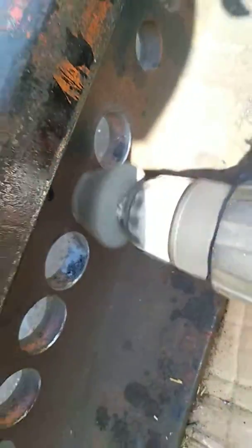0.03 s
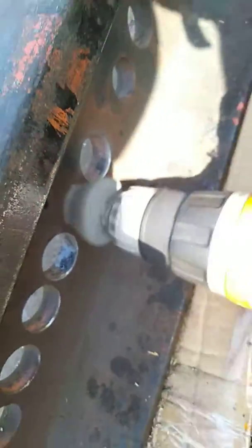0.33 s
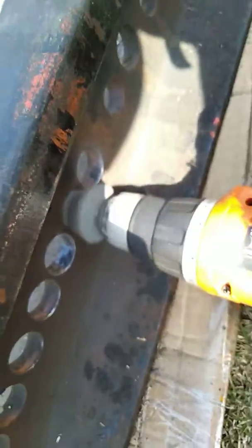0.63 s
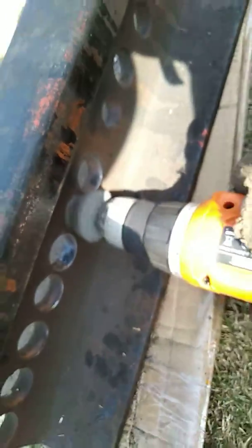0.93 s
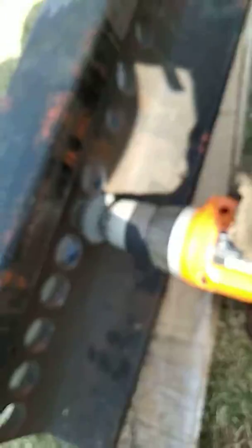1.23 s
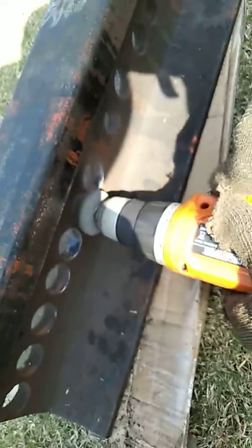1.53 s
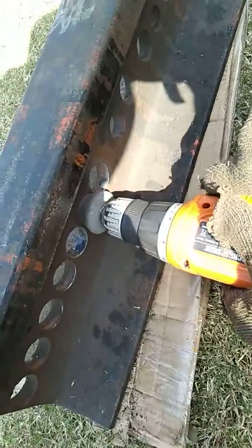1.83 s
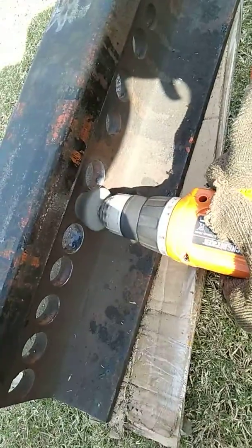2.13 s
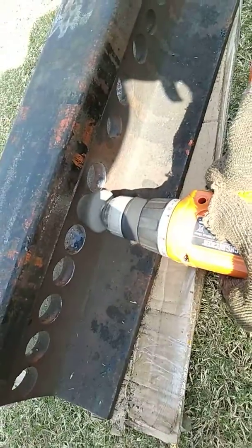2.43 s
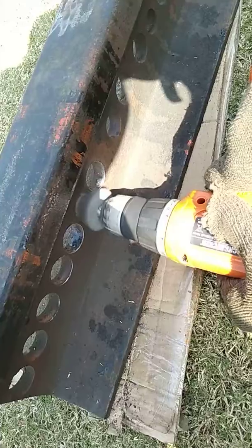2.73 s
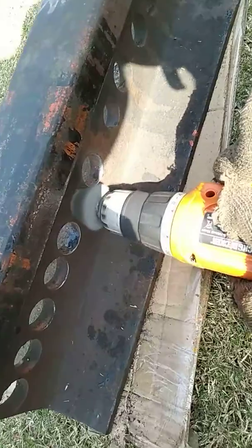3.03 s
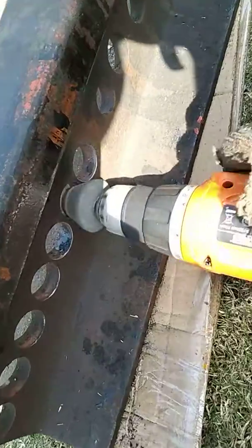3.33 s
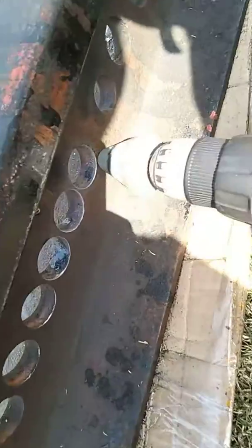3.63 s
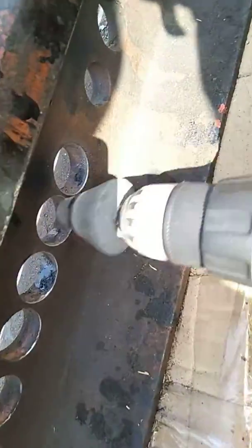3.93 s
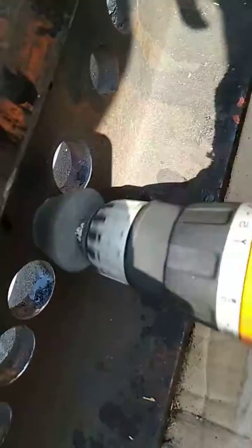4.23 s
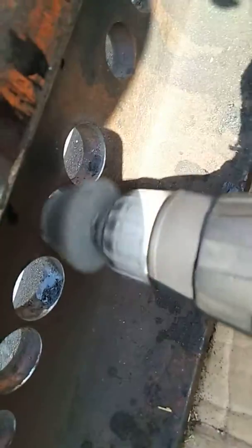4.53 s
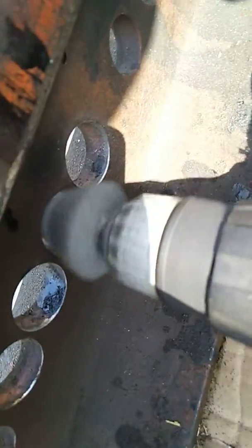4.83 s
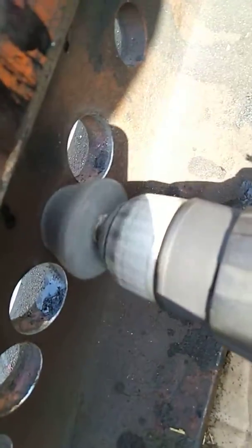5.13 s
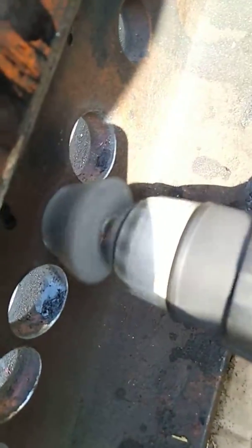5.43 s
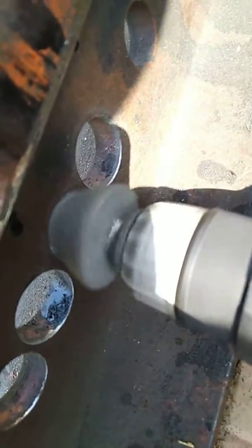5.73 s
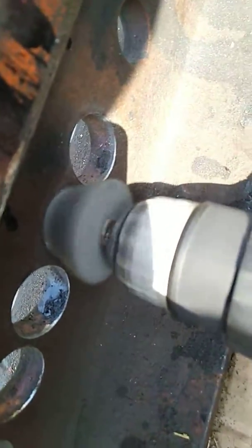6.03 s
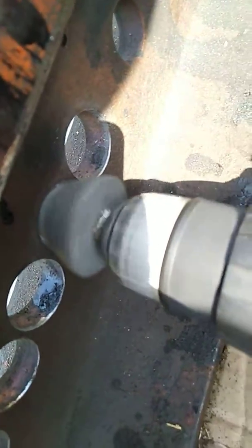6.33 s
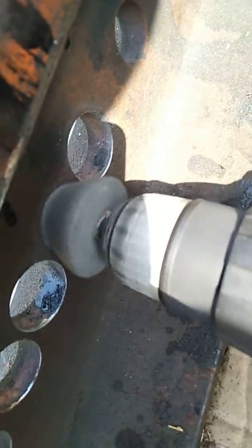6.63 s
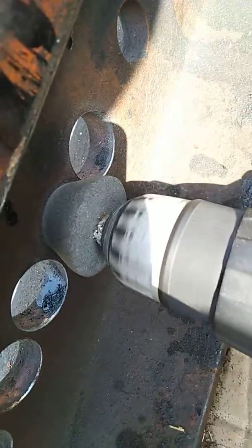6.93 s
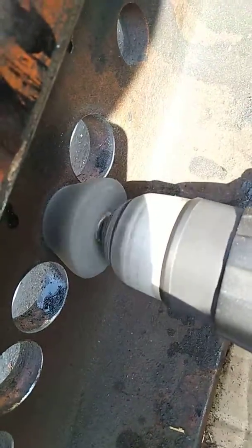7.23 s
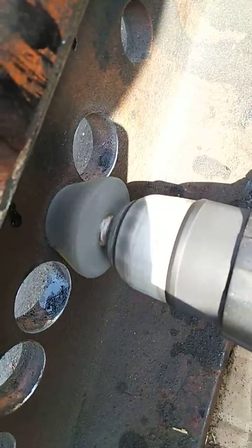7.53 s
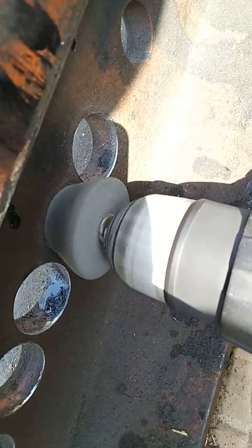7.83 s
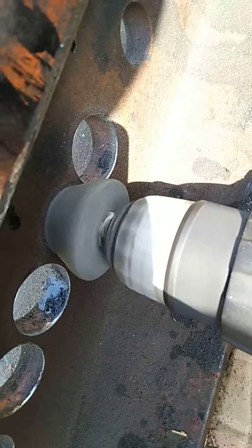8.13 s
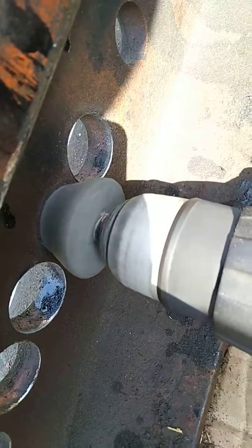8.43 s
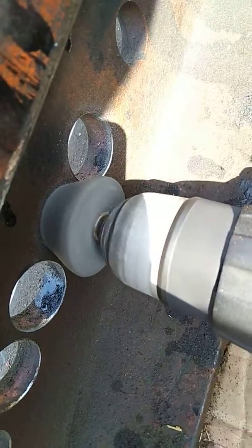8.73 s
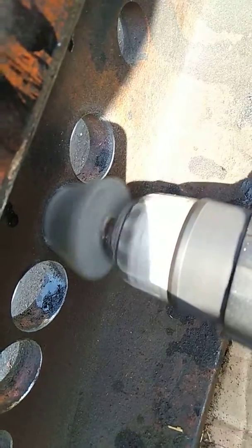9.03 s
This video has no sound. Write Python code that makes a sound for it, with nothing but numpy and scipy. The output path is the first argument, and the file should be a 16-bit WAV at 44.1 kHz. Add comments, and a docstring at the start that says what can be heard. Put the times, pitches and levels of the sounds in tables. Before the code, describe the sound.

A cordless drill grinds a steel rail outdoors with a harsh, chattering rasp, pausing briefly twice while the metal rings.

```python
"""Outdoors, close to a steel rail: a cordless drill grinds the edge of a hole in it.
The stone bounces against the edge in three long, chattering pushes, then rubs lightly, catches
a few times and starts to chatter again. Its grit scratches and hisses. The rail rings under it,
and rings on freely when the stone is lifted off; motor and gears whir behind, over a soft rumble."""
import sys
import numpy as np
from scipy import signal
from scipy.fft import rfft, irfft
from scipy.io import wavfile
from scipy.ndimage import uniform_filter1d, map_coordinates

SR = 44100
rng = np.random.default_rng(int(sys.argv[2]) if len(sys.argv) > 2 else 0)


def waveform_to_disk(signal):
    """Save audio, clipped to [-1, 1], as 16-bit WAV at the path in sys.argv[1]."""
    frames = np.transpose(np.atleast_2d(signal))
    scaled = np.clip(frames, -1, 1) * 32767
    samples = np.round(scaled).astype(np.int16)
    wavfile.write(sys.argv[1], SR, samples)


N = 410130
T = np.arange(N) / SR

# the modes of the struck rail: pitch_hz, level_db, t60_s
RAIL_MODES = [(614, -18, 1.0), (861, -5, .22), (1028, -16, .15), (1277, -8, .3), (1405, 2, .33),
              (1917, 4, .34), (2454, -15, .39), (2740, -20, .3), (2946, -5, .27), (3225, -13, .18),
              (3887, -26, .3), (4565, -14, .22), (5179, -26, .28), (5286, -33, .9), (5432, -24, .28),
              (6363, -17, .3), (6482, -16, .2), (6775, -24, .3), (7460, -10, .15), (7790, -10, .25),
              (8204, -25, .25), (9932, -30, .2), (14820, -25, .15), (15390, -22, .16)]
# its shrill upper modes, the screech: pitch_hz, level_db, t60_s
SHRILL_MODES = [(2740, -9, .3), (2946, -1, .3), (4565, -3, .3), (5432, -14, .3), (6363, -13, .3),
                (6482, -9, .25), (6775, -10, .3), (7460, -1, .15), (7790, 0, .22)]
# its main, singing modes: pitch_hz, level_db (relative to the stone's drive)
MAIN_MODES = [(861, -11.5), (1277, -10.5), (1405, -9), (1917, -7), (2454, -15.5)]
# EQ of the stone rubbing, the midrange body: freq_hz, gain_db
RUB_EQ = [(100, -14.5), (200, -13.5), (290, -13.5), (380, -9.5), (560, 1), (800, 1.5), (1300, 2.5),
          (1600, -3), (1950, -0.5), (2300, -20.5), (3200, -26)]
# EQ of the grit cutting steel, the bright rasp: freq_hz, gain_db
CUT_EQ = [(1400, -3), (2100, 3.5), (2500, -0.5), (3050, -0.5), (3700, -7), (4700, -9.5), (5600, -13),
          (6600, -12.5), (8000, -20), (12000, -23)]
# EQ of the grinding hiss on top: freq_hz, gain_db
HISS_EQ = [(4500, -20), (6300, -9), (7100, -4), (7700, 2), (8200, -2), (9000, -10.5), (10200, -11.5),
           (12200, -17.5), (13800, -10), (15300, -11.5), (16000, 1.5)]


def amp(db):
    """Decibels to gain."""
    return 10 ** (np.asarray(db) / 20)


def unit(x):
    """Scale to rms 1."""
    return x / np.sqrt(np.mean(x ** 2) + 1e-20)


def curves(rows):
    """Automation: one value per sample for each column after the time."""
    times, *columns = np.transpose(rows)
    return [np.interp(T, times, column) for column in columns]


def wobble(rate_hz):
    """A smooth random curve with rate_hz knots a second."""
    return map_coordinates(rng.standard_normal(int(N * rate_hz / SR) + 4), [T * rate_hz])


def held(start_s, end_s, release_s, attack_s=.041):
    """An envelope in dB, 0 from start to end; the attack and release times each span 30 dB."""
    return -30 * (np.clip(start_s - T, 0, None) / attack_s + np.clip(T - end_s, 0, None) / release_s)


def coloured(x, eq):
    """x through a minimum-phase filter drawn from (freq_hz, gain_db) points."""
    hz, db = np.transpose(eq)
    log_bins = np.log(np.fft.rfftfreq(4096, 1 / SR) + 1)
    gain_db = np.interp(log_bins, np.log([hz[0] / 2, *hz, hz[-1] * 2]), [db[0] - 38, *db, db[-1] - 29.5])
    cepstrum = irfft(np.log(amp(gain_db)))
    fold = 1 + np.sign(len(cepstrum) / 2 - np.arange(len(cepstrum)))
    fold[0] = 1
    return signal.oaconvolve(x, irfft(np.exp(rfft(cepstrum * fold))))[:N]


def grit(clump_db, clump_hz):
    """Grainy noise in dense, short clumps."""
    return rng.standard_normal(N) * amp(clump_db * wobble(clump_hz))


def ring(t, modes):
    """Decaying sines from (pitch_hz, level_db, t60_s) rows."""
    return sum(amp(db - 60 * t / t60) * np.sin(2 * np.pi * hz * t) for hz, db, t60 in modes)


def excite(modes, drive):
    """Modes kept ringing by noise that follows the drive, at rms 1."""
    return unit(signal.oaconvolve(drive * rng.standard_normal(N), ring(T[:SR // 2], modes))[:N])


def impacts(cycles, scatter_s, spread_db):
    """One impulse, uneven in size and timing, each time the cycle count passes a whole number."""
    at = np.flatnonzero(np.diff(np.floor(cycles)) > 0)
    late, size = rng.standard_normal((len(at), 2)).T
    return np.bincount(np.clip(at + late * scatter_s * SR, 0, N - 1).astype(int), amp(spread_db * size), N)


def outdoor_rumble():
    """A soft, low outdoor rumble, turned down under the loudest grinding as by automatic gain control."""
    # the rumble's fader: time_s, level_db
    fader = [(0, -54), (4.1, -49.5), (5.5, -60), (6.6, -65), (7.2, -48), (9.3, -53)]
    # its bass-heavy EQ: freq_hz, gain_db
    rumble_eq = [(15, -50), (25, -13), (102, -6.5), (145, -11), (198, -4.5), (295, -21.5), (314, -16.5),
                 (361, -15.5), (1000, -18.5), (1400, -27), (3500, -39.5), (12000, -49)]
    return amp(curves(fader)[0] + .89 * wobble(3.68)) * unit(coloured(rng.standard_normal(N), rumble_eq))


def drill(motor_hz, motor_turns):
    """Under power the motor whines and the gears rush; the speed control whistles thinly throughout."""
    # the trigger is held: start_s, end_s
    trigger = [(0, 1.68), (1.991, 3.34), (4.225, 9.3)]
    # the motor's partials: multiple of motor speed, level_db
    partials = [(2, -58), (3, -56), (4, -56), (5, -66), (9.25, -47)]
    # EQ of the gear rush: freq_hz, gain_db
    gear_eq = [(400, -14), (800, -1), (1300, 2), (2000, -6.5), (3200, -18.5), (6000, -24), (12000, -22.5)]
    powered = amp(np.max([held(on, off, release_s=.15) for on, off in trigger], axis=0))
    whine = sum(amp(db) * np.sin(2 * np.pi * k * motor_turns) for k, db in partials)
    whine *= amp(2.5 * wobble(20))
    gears_db = -37 + 3 * np.log2(motor_hz / 360)  # 3 dB louder as the speed doubles
    gears = amp(gears_db) * unit(coloured(grit(clump_db=.5, clump_hz=330), gear_eq))
    whistle = amp(-76 + 3.3 * wobble(8.6)) * np.sin(2 * np.pi * 9781 * T + wobble(200))
    return powered * (whine + gears) + whistle


def free_ring(lift_s=3.38, return_s=4.27):
    """With the stone lifted the rail hums on, until the next push damps it."""
    # the undamped rail: pitch_hz, level_db, t60_s
    free_modes = [(861, -37, 0.52), (1270, -41, 0.61), (1403, -25, 0.47), (1405, -36, 33),
                  (1925, -33, 0.67), (2454, -38, 1.86), (2946, -41, 0.39), (5286, -55.5, 1.2),
                  (6778, -62, 1.8), (8204, -52, 0.56)]
    t = np.clip(T - lift_s, 0, None)
    damping = np.exp(-np.clip(T - return_s, 0, None) / .03)
    return ring(t, free_modes) * (1 - np.exp(-t / .0071)) * damping


def squeak():
    """A rough stick-slip tone that sinks as the motor nearly stalls."""
    # the squeak's glide: time_s, pitch_hz, level_db (before the trim)
    glide = [(6.82, 2340, -90), (6.85, 2200, -35), (6.89, 1900, -21), (6.92, 1920, -47), (6.95, 2020, -28),
             (7.0, 2000, -90)]
    hz, db = curves(glide)
    rough_hz = hz * (1 + .025 * wobble(1200))
    return amp(db - 1.5) * np.sin(2 * np.pi * np.cumsum(rough_hz) / SR)


def catches():
    """The stone snags: a short harsh rattle, and the rail rings after it."""
    # snags on the edge: start_s, rattle_gain_db, length_s, ring_gain_db
    snags = [(1.233, -14, 0.0042, -39), (1.676, -14, 0.023, -20.5), (2.079, -19, 0.0089, -26.5),
             (4.248, -18, 0.018, -25.5), (6.772, -49, 0.012, -24), (8.011, -12.5, 0.0067, -28),
             (8.119, -22, 0.0066, -37), (8.37, -14.5, 0.016, -29), (8.503, -12.5, 0.012, -29.5),
             (8.666, -18, .005, -32), (8.806, -13.5, 0.0098, -31), (8.967, -13, 0.024, -25)]
    force, ringing, t = np.zeros(N), np.zeros(N + SR), T[:SR // 2]
    for start_s, rattle_db, length_s, ring_db in snags:
        after = np.clip(T - start_s, 0, None)
        release = np.exp(-np.clip(after - length_s, 0, None) / .01)
        force += amp(rattle_db) * (1 - np.exp(-after / .00035)) * release
        modes = [(hz, db + rng.normal(0, .5), t60) for hz, db, t60 in RAIL_MODES]
        modes += [(hz, db - 6, .5 * t60) for hz, db, t60 in SHRILL_MODES]  # a brief screech
        tail = amp(ring_db) * np.minimum(t / length_s, 1) * ring(t, modes)
        ringing[round(start_s * SR):][:len(t)] += tail
    rattle = sum(amp(db) * unit(coloured(grit(clump_db=1.5, clump_hz=970), eq))
                 for eq, db in [(RUB_EQ, -10), (CUT_EQ, -10), (HISS_EQ, -14)])
    return force * rattle + ringing[:N]


def singing_rail(rub_db, cut_db):
    """Rubbing and cutting keep the rail's main modes sounding; now one, now another swells."""
    # the contact point favours one mode for a while: middle_s, length_s, pitch_hz, gain_db
    swells = [ (.45, 0.26, 2454, 6.5), (.75, 0.4, 1405, 6.9), (.92, 0.27, 1917, 10), (1.53, 0.48, 1405, 15),
              (1.52, 0.75, 2454, 15.4), (2.25, 0.27, 1405, 10.7), (2.42, 0.66, 2454, 14),
              (3.17, 0.52, 1405, 9.7), (4.32, 0.074, 1917, 7.9), (4.55, .7, 861, 9), (4.85, 0.39, 1405, 13),
              (4.97, 0.13, 861, 9.9), (5.13, .16, 1405, 10.8), (5.34, 0.24, 861, 6), (5.4, 1.4, 2454, 11.5),
              (6.2, 2.2, 861, 7.1), (6.15, 1.13, 1405, 11.9), (6.5, .4, 1917, 4.7), (7.98, 0.23, 2454, 15),
              (8.85, 0.45, 2454, 16), (9.25, .3, 2454, 12)]
    drive_db = (rub_db + cut_db) / 2
    out = np.zeros(N)
    for hz, mode_db in MAIN_MODES:
        resonance = ring(T[:SR // 2], [(hz, 0, .55)])
        tone = signal.oaconvolve(rng.standard_normal(N + SR // 2), resonance, "valid")[:N]
        tone /= np.sqrt(np.abs(uniform_filter1d(tone ** 2, size=3800)) + 1e-12)  # even out the level
        swell_db = sum(db * np.exp(-(2 * (T - middle_s) / length_s) ** 2)
                       for middle_s, length_s, pitch_hz, db in swells if pitch_hz == hz)
        out += amp(drive_db + mode_db + swell_db) * tone
    return out


def hand_pressure():
    """Faders in dB for rub, cut, hiss and screech: each gesture holds its own, under a wavering hand."""
    # strokes of the stone, plus faint handling noise and a small click while it is lifted:
    # start_s, end_s, rub_db, cut_db, hiss_db, screech_db, release_s
    gestures = [ (0, 1.06, -25, -30, -32.5, -48, .2), (1.104, 1.126, -23, -29, -30.5, -53, 0.29),
                (1.254, 1.282, -25, -31, -30.5, -55, 0.14), (1.35, 1.466, -38, -41, -38, -57, .11),
                (1.474, 1.704, -36.5, -41, -37, -49, 0.13), (2.08, 2.48, -27, -28, -34, -59, 0.13),
                (2.488, 3.356, -25, -29, -32.5, -52, 0.12), (3.56, 3.757, -69, -78, -73, -85, .1),
                (3.667, 3.675, -53, -68, -58, -80, .08), (4.057, 4.2, -57, -64, -69, -85, .1),
                (4.26, 4.624, -23.5, -30, -33, -43, .1), (4.607, 5.02, -26, -32.5, -32.5, -43, .1),
                (5.024, 5.183, -24.5, -27.5, -32.5, -33.5, .1), (5.186, 5.3, -30.5, -27, -31.5, -36.5, .1),
                (5.268, 6.512, -25, -28.5, -33, -36.5, 0.12), (6.517, 6.788, -25, -25.5, -30, -33.5, 0.037),
                (6.84, 7.024, -38, -41.5, -44.5, -52, .1), (7.022, 7.412, -29, -38.5, -35.5, -56, 0.12),
                (7.42, 8.013, -28, -36, -32.5, -46, 0.18), (8.068, 8.626, -31.5, -38, -35.5, -51, 0.23),
                (8.645, 8.954, -29.5, -37.5, -35.5, -50, 0.35), (8.978, 9.3, -25, -30, -32, -45, .1)]
    faders_db = np.full((4, N), -120.)
    for start_s, end_s, *layers_db, release_s in gestures:
        faders_db = np.maximum(faders_db, np.array(layers_db)[:, None] + held(start_s, end_s, release_s))
    return faders_db + .9 * wobble(11)


def chatter_spells():
    """A soft gate that opens while the stone bounces, and the bounce rate."""
    # one list per spell of chatter, most starting fast and settling: time_s, bounce_hz
    spells = [
        [(0, 80.9), (.4, 77.02), (.52, 80.53), (.9, 72.93), (1.06, 70.04)],
        [(2.09, 122), (2.2, 104.3), (2.5, 88.19), (2.9, 83.88), (3.37, 87.53)],
        [(4.26, 130), (4.32, 86.24), (4.47, 77.86), (4.6, 82.55), (5.03, 84.37), (5.14, 119.4), (5.19, 184.7)],
        [(5.21, 185.2), (5.28, 143.4), (5.35, 146.7), (5.43, 122), (5.75, 121.4), (6.0, 128.4), (6.25, 122.6),
         (6.56, 130.1), (6.66, 182.3), (6.79, 213)],
        [(8.99, 188.5), (9.03, 117.3), (9.07, 99.7), (9.3, 87.9)],
    ]
    gate = sum(((T >= rows[0][0]) & (T <= rows[-1][0])).astype(float) for rows in spells)
    return np.clip(uniform_filter1d(gate, size=900), 0, 1), curves(np.vstack(spells))[0]


def growl(cycles, bounce_hz, peak_hz=122):
    """The chattering stone buzzes on multiples of its bounce rate, above all the seventh and eighth."""
    # the buzz: multiple of bounce rate, relative level_db
    harmonics = [(1, -49), (2, -56.5), (3, -51.5), (4, -50.5), (6, -49), (7, -41.5), (8, -41)]
    level_db = 3 - 6 * np.abs(np.log2(bounce_hz / peak_hz))
    return sum(amp(level_db + db + 2.2 * wobble(30)) * np.sin(2 * np.pi * round(k) * cycles)
               for k, db in harmonics)


def hammering(cycles, bounce_hz, slowness=.22):
    """The stone strikes one side of the hole, then more weakly the other, which favours odd harmonics."""
    # EQ of the blows: freq_hz, gain_db
    blow_eq = [(55, -33.5), (90, -16), (160, -5.5), (250, -16.5), (330, -2.5), (420, -4.5), (530, 3.5),
               (690, 0), (860, 3.5), (1080, 0), (1400, 1), (2200, -6.5), (4000, -31), (9000, -27.5)]
    near_side = impacts(cycles, scatter_s=.00005, spread_db=1.1)
    far_side = impacts(cycles + .5, scatter_s=.00012, spread_db=2)
    blows = (near_side - .35 * far_side) / np.sqrt(bounce_hz)
    # high bending waves travel faster in steel, so each blow spreads into a short chirp
    dispersion = np.exp(-2j * np.pi * slowness * np.sqrt(np.fft.rfftfreq(N, 1 / SR)))
    return unit(coloured(irfft(rfft(blows) * dispersion, N), blow_eq))


def grinding(motor_turns, rub_db, cut_db, hiss_db, screech_db):
    """The stone rubs, bounces and cuts, and its grit sets the rail ringing and screeching."""
    # EQ of the scrape within the chatter: freq_hz, gain_db
    scrape_eq = [(250, -26.5), (500, -1.5), (750, 0.5), (1000, 1.5), (1300, 4), (1600, -3.5), (1950, -4),
                 (2300, -38), (3200, -32)]
    gear_ratio, blow_share = 42, .52  # blow_share: the part of the chatter's power that is clean blows
    chuck_turns = motor_turns / gear_ratio
    chattering, bounce_hz = chatter_spells()
    # the stone runs out of true, so it presses harder and bounces faster once per turn of the chuck
    runout = np.cos(2 * np.pi * (chuck_turns + .53))
    sway = .028 * (np.minimum(bounce_hz, 130) / 85) ** 1.5
    cycles = np.cumsum(bounce_hz * (1 + sway * runout + .0035 * wobble(40))) / SR
    press = amp(.5 * runout + .35 * wobble(28))
    blows = hammering(cycles, bounce_hz)
    thrum = chattering * growl(cycles, bounce_hz)
    # each bounce digs the grit in; between spells every motor turn shakes it
    digging = unit(.4 + np.exp(-((cycles - .2) % 1) / .89))
    shake = 1 + .1 * (1 - chattering) * np.cos(2 * np.pi * motor_turns)
    bite = (1 + chattering * (digging - 1)) * shake
    rubbing = unit(coloured(bite * grit(clump_db=2, clump_hz=500), RUB_EQ))
    scraping = unit(coloured(bite * grit(clump_db=.5, clump_hz=500), scrape_eq))
    chatter = np.sqrt(blow_share) * blows + np.sqrt(1 - blow_share) * scraping
    body = amp(rub_db) * (np.sqrt(1 - chattering) * rubbing + np.sqrt(chattering) * chatter)
    # the stone's high spot digs in once per turn of the chuck
    surge_db = .5 * chattering * (sway / sway.max()) ** 2 * np.cos(2 * np.pi * (chuck_turns + .64))
    scratch = bite * amp(surge_db + 1.6 * wobble(600))
    cutting = amp(cut_db - .4) * unit(coloured(scratch * grit(clump_db=4.5, clump_hz=3000), CUT_EQ))
    hiss = amp(hiss_db + 1.5) * unit(coloured(scratch * grit(clump_db=1, clump_hz=3000), HISS_EQ))
    side_modes = [mode for mode in RAIL_MODES if all(abs(mode[0] - hz) > 60 for hz, _ in MAIN_MODES)]
    ringing = amp(cut_db - 8 + 1.1 * wobble(8)) * excite(side_modes, scratch)
    screech = amp(screech_db + 2.8 * surge_db + 1.5 * wobble(11)) * excite(SHRILL_MODES, scratch)
    return press * (body + cutting + hiss) + thrum + ringing + screech


def scene():
    """Stone, rail and drill over a soft outdoor rumble, in mono."""
    # the drill's speed: time_s, motor_hz (turns a second)
    speed = [(0, 392), (1.15, 392), (1.3, 420), (1.62, 420), (1.96, 30), (2.05, 240), (2.2, 385),
             (3.33, 385), (3.5, 85), (4.17, 85), (4.3, 385), (5.0, 385), (5.3, 355), (6.78, 355),
             (6.88, 205), (7.13, 338), (7.9, 372), (8.4, 336), (9.3, 345)]
    motor_hz, = curves(speed)
    motor_turns = np.cumsum(motor_hz * (1 + .003 * wobble(25) + .004 * wobble(300))) / SR
    rub_db, cut_db, hiss_db, screech_db = hand_pressure()
    rumble = outdoor_rumble()
    stone = grinding(motor_turns, rub_db, cut_db, hiss_db, screech_db)
    rail = singing_rail(rub_db, cut_db) + free_ring()
    return (rumble + stone + rail + catches() + squeak() + drill(motor_hz, motor_turns))[None]


def record(dry):
    """A soft clipper rounds off the peaks, then a brick-wall low-pass trims the top."""
    ceiling, top_hz = .38, 15750
    soft = dry / (1 + np.abs(dry / ceiling) ** 6) ** (1 / 6)
    return irfft(rfft(soft) * (np.fft.rfftfreq(N, 1 / SR) < top_hz), N)


dry = scene()
out = record(dry)
waveform_to_disk(out)
```